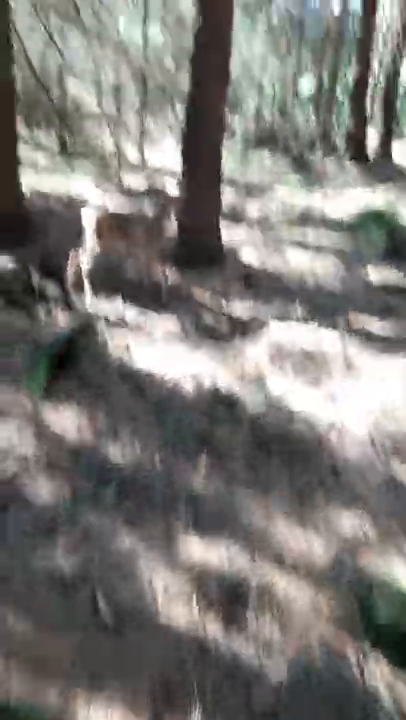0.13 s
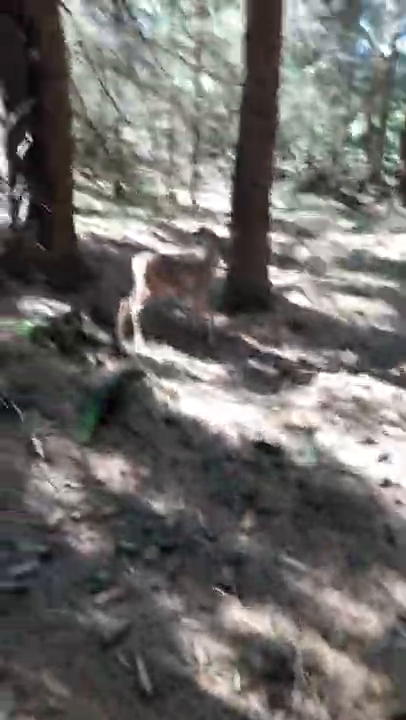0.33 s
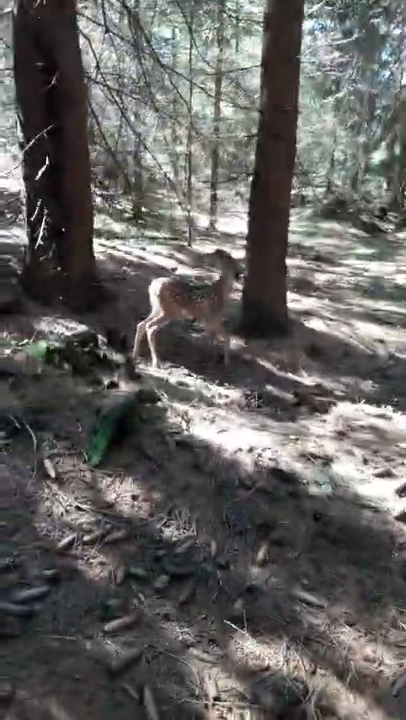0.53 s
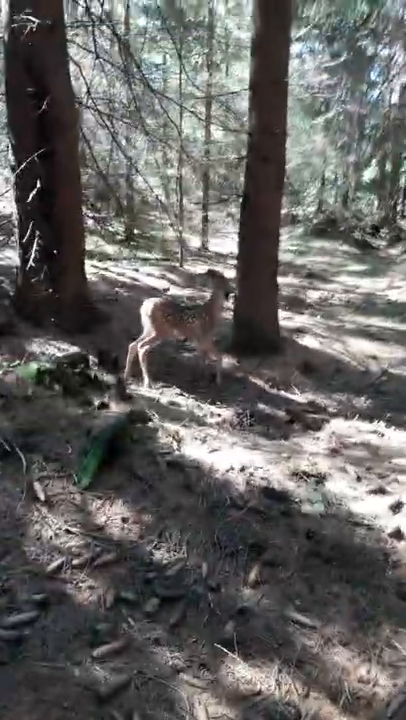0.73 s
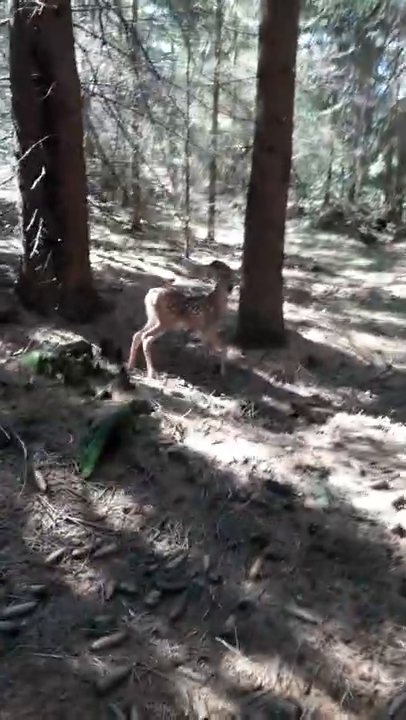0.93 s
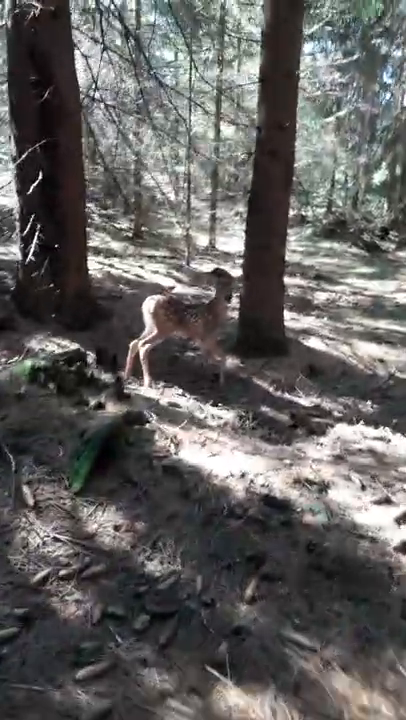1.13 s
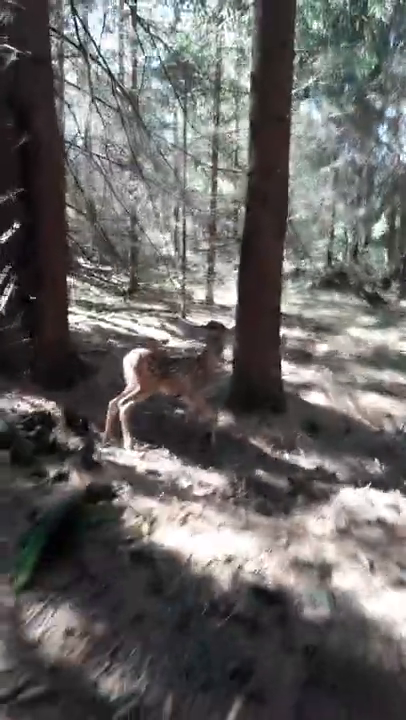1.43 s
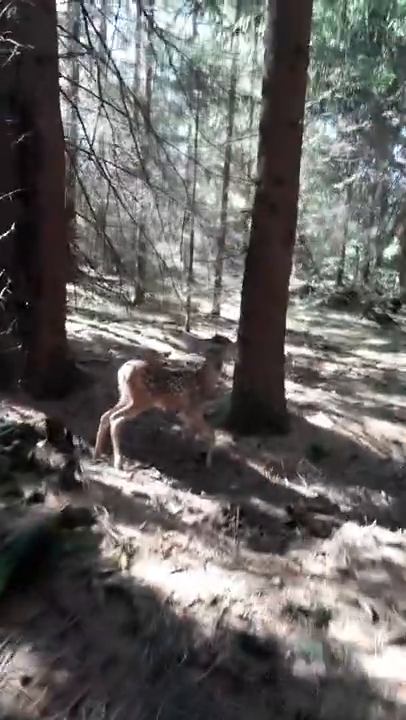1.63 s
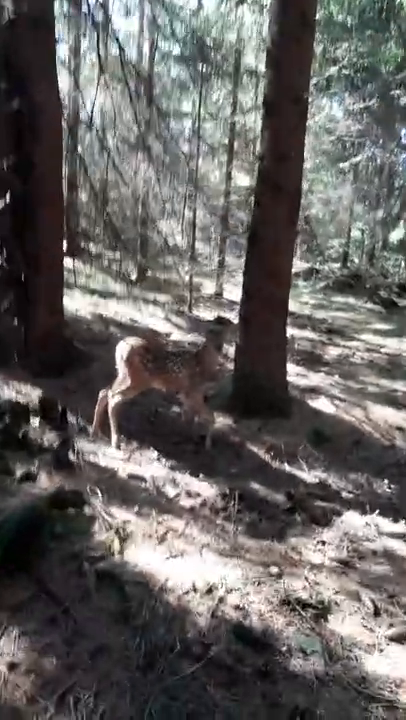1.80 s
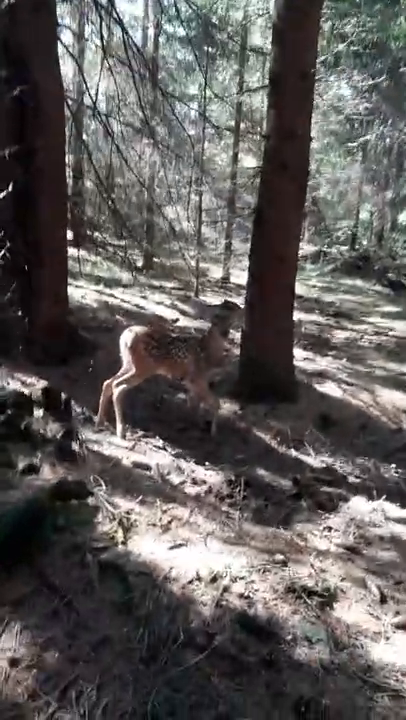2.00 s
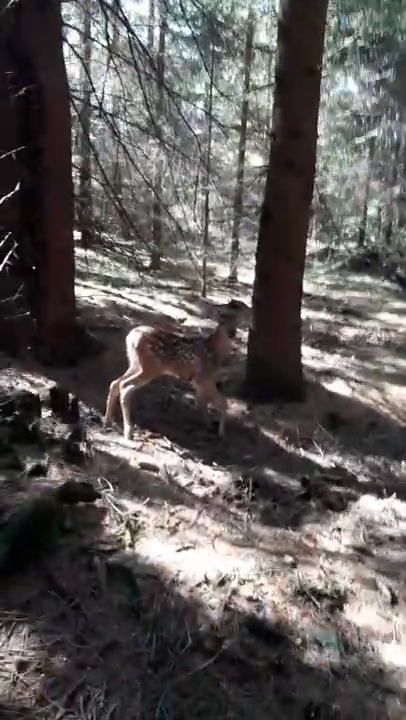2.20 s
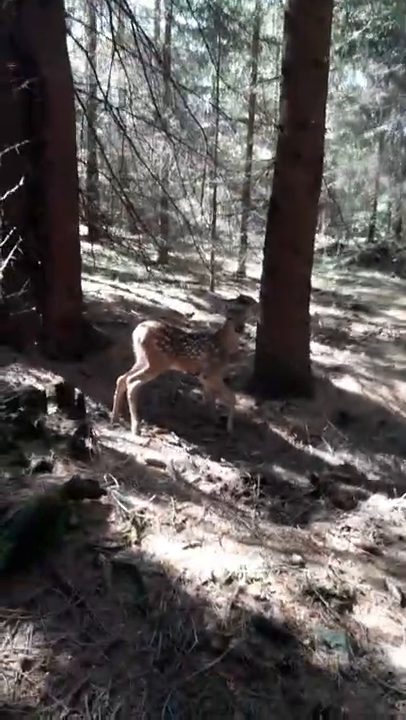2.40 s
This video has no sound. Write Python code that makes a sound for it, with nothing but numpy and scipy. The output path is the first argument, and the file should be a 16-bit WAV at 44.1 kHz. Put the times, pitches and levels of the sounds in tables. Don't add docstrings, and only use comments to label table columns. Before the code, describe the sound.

A fawn's single loud bleat starts near 0.2 s, sweeps up quickly to a bright, nasal, squeaky held pitch, then drops and stops by 0.8 s, leaving a diffuse echo among the trunks. From about 0.7 to 1.6 s a distant finch trills downward, then adds three swooping whistles and a buzzy falling slur until 2.5 s. Dry needles faintly rustle and snap throughout over low air and microphone hiss.

```python
import sys
import numpy as np
from scipy import signal
from scipy.fft import rfft, irfft, next_fast_len
from scipy.io import wavfile
from scipy.ndimage import uniform_filter1d, map_coordinates

SR = 44100
rng = np.random.default_rng(int(sys.argv[2]) if len(sys.argv) > 2 else 0)


def dump(signal):
    limited = np.clip(np.atleast_2d(signal).T, -1, 1)
    pcm = np.round(limited * 32767).astype(np.int16)
    wavfile.write(sys.argv[1], SR, pcm)


def magnitude_from_level(level_db):
    exponent = np.asarray(level_db, float) / 20
    return 10 ** exponent


N = 112454
T = np.arange(N) / SR

# [t/s, pitch f/Hz, effort level/dB, mouth opening 0-1, brightness dB/octave]
BLEAT = [
    (0.186, 399, -47, 0.96, 5),
    (0.238, 532.7, -23.5, 0.02, 1.5),
    (0.292, 637, -18.5, 0.2, .1),
    (.35, 676.8, -17.5, 0.5, 1.53),
    (0.459, 706.5, -20, 0.8, 0.5),
    (0.498, 700, -18, 0.9, 0.9),
    (.612, 704.3, -19.5, 1, 1.24),
    (.65, 639, -17.5, 0.85, 0.72),
    (0.791, 399.4, -33.5, 0.5, -4),
]
# [f/Hz, width/Hz, level/dB]
THROAT_EARLY = [(700, 300, -8), (1203, 500, -4.5), (1750, 260, 2.5), (2524, 190, 0), (3400, 400, -5),
                (3982, 350, -3.5), (5060, 510, -7.5), (6093, 500, -14), (7430, 700, -21),
                (8900, 270, -21.5), (10600, 900, -55), (14000, 900, -61)]
# [f/Hz, width/Hz, level/dB]
THROAT_LATE = [(777.6, 380, -1), (1181, 220, 3), (2100, 430, -7), (2760, 390, 4), (3534, 400, -14.5),
               (4114, 350, -5.5), (5126, 400, -15), (6218, 620, -15.5), (7000, 400, -34.5),
               (8690, 400, -35.5), (10250, 900, -47), (14000, 900, -63)]
# [f/Hz, width/Hz, depth/dB]
CALL_GAPS = [(4600, 220, 20.5), (6750, 240, 22), (12300, 1800, 13), (7350, 350, 7.5)]
# [f/Hz, time to fall 60 dB t/s]
WOOD_RING = [(400, 0.24), (1300, 0.73), (3000, 0.75), (6000, 0.87), (10000, 0.24)]
# [f/Hz, time to fall 60 dB t/s]
DEEP_RING = [(500, 0.67), (1500, 1.7), (4000, 1.5), (8000, 0.55)]
# [f/Hz, time to fall 60 dB t/s]
FINCH_RING = [(2000, 0.2), (3500, 0.79), (5000, 0.56)]
# [start t/s, length t/s, from f/Hz, to f/Hz, bend, level/dB]
TRILL = [
    (-.002, .018, 6500, 4100, .35, 8),
    (.024, .024, 2950, 4857, 1.1, 7),
    (0.061, .02, 4124, 3600, .5, 2),
]
# [t/s, f/Hz, level/dB]
SWOOP = [
    (0, 3400, 6),
    (0.029, 2000, -5.5),
    (.055, 2400, -1),
    (0.096, 4807, 8.5),
    (0.124, 4640, -4.5),
    (.16, 4500, -20),
]
SWOOP_STARTS = [1.665, 1.833, 2.003]
# [t/s, f/Hz, level/dB, buzz depth f/Hz]
SLUR = [
    (2.178, 5000, -42.5, -2),
    (2.195, 6360, -53.5, 201.5),
    (2.25, 5550, -47, 884.5),
    (2.30, 5050, -53, 897),
    (2.345, 4600, -49, 500),
    (2.355, 4250, -48.5, 0),
    (2.44, 2900, -51.5, -6),
    (2.52, 2100, -51, 0),
    (2.55, 1850, -67, 0),
]
# [middle t/s, length t/s, level/dB, crisp top level/dB]
SHUFFLES = [(.03, 0.49, -67.5, 6), (.78, .05, -46.5, -8), (1.17, 0.081, -65, 5), (1.414, .17, -54.5, -3.5),
            (1.525, 0.088, -58, 3.5), (1.628, 0.13, -58, 10), (1.711, 0.056, -61, 2),
            (1.95, 0.068, -66.5, 9.5), (2.06, 0.056, -88, 9.5), (2.55, 0.055, -60.5, 6.5)]
# [t/s, peak level/dB]
SNAPS = [(.073, -41), (.113, -50), (1.173, -43), (1.338, -38.5), (1.506, -52), (1.54, -59), (1.826, -56),
         (1.957, -45), (2.078, -51.5)]
# [middle t/s, length t/s, f/Hz, level/dB]
SCUFFS = [(1.472, 0.093, 1728, -60), (1.66, .03, 1400, -66), (2.355, 0.011, 1750, -70.5)]
# [f/Hz, level/dB]
LITTER = [(300, -43.5), (1500, -18), (4300, -19), (5600, -1.5), (6600, -4), (7200, -26.5), (8800, -16.5),
          (9600, -37.5)]
# [f/Hz, level/dB]
AIR = [(20, -42), (50, -13.5), (110, -3.5), (200, -10), (600, -15.5), (3000, -18), (10000, -28.5),
       (15000, -30.5)]

GLIDE_S, ONSET_S, RELEASE_S = 0.022, 0.012, 0.0092
SKIRT_DB, SHIMMER_DB, JITTER = -77.5, 2.5, 0.0015
BREATH_DB, SLACK_BREATH_DB, SLACK_FLUTTER_DB = -32, 30, 11
UNDERTONE_BELOW_HZ, UNDERTONE_DB = 376, -50
CLOSE_S, CLOSE_DB_PER_S = 0.738, 800
LOW_CUT_HZ = 480
EARLY_DB, EARLY_T60_S, EARLY_FROM_HZ = -8, 0.08, 1400
WOOD_DB, WOOD_DELAY_S, DEEP_WOOD_DB = -20, 0.02, -36
TRILL_START_S, TRILL_PERIOD_S, TRILL_SINK, TRILL_DB = 0.664, 0.111, 0.034, -51
NOTE_ARCH_DB = 9.5
SWOOP_DB, BUZZ_HZ = -51, 167
WAVER_HZ, WAVER_DB = 50, 2.5
FAR_DIRECT_DB, FLOURISH_DIRECT_DB = -3, -9
GRAINS_PER_S, GRAIN_SPREAD_DB = 1500, 2.6
LITTER_BED_DB, FADE_STRETCH, AIR_DB = -64, 1.4, -72
TOP_HZ = 15700


def unit(x):
    return x / np.sqrt(np.mean(x ** 2) + 1e-20)


def along(points, hz):
    f, v = np.transpose(points)
    return np.interp(np.log(hz + 1), np.log(f + 1), v)


def wobble(rate):
    return map_coordinates(rng.standard_normal(int(N * rate / SR) + 4), [T * rate])


def filtered(x, response):
    m = next_fast_len(N + SR // 2)
    return irfft(rfft(x, m) * response(np.fft.rfftfreq(m, 1 / SR)), m)[:N]


def low_cut(hz, edge_hz, steepness):
    return 1 / (1 + (edge_hz / (hz + 1)) ** steepness)


def throat(peaks, hz):
    power = sum(magnitude_from_level(2 * db) / (1 + (2 * (hz - c) / w) ** 2) ** 2 for c, w, db in peaks)
    return np.sqrt(power + magnitude_from_level(2 * SKIRT_DB))


def fawn():
    s, *cols = np.transpose(BLEAT)
    smooth = [uniform_filter1d(np.interp(T, s, c), int(GLIDE_S * SR)) for c in cols]
    pitch, effort_db, mouth, tilt_db = smooth
    pitch = pitch * (1 + JITTER * wobble(90))
    mouth = np.clip(mouth, 0, 1)
    gate = np.clip((T - s[0]) / ONSET_S, 0, 1) * np.clip((s[-1] - T) / RELEASE_S, 0, 1)
    phase = 2 * np.pi * np.cumsum(pitch) / SR
    slack = 1 - pitch / pitch.max()
    shut_db = CLOSE_DB_PER_S * np.clip(T - CLOSE_S, 0, 1)

    voice = 0
    for k in range(1, 21):
        hz = k * pitch
        shape = throat(THROAT_EARLY, hz) ** (1 - mouth) * throat(THROAT_LATE, hz) ** mouth
        shape = shape * magnitude_from_level(tilt_db * np.log2(hz / 1500))
        unsteady_db = SHIMMER_DB * wobble(35) + SLACK_FLUTTER_DB * slack * wobble(90)
        level_db = min(k / 5, 1) * unsteady_db - min(k - 1, 2) / 2 * shut_db
        voice = voice + shape * magnitude_from_level(level_db) * np.sin(k * phase + rng.uniform(0, 2 * np.pi))

    breath = unit(filtered(rng.standard_normal(N), lambda hz: throat(THROAT_EARLY, hz)))
    breath = breath * (1 + np.cos(phase))
    breath_db = BREATH_DB + SLACK_BREATH_DB * slack + tilt_db - shut_db
    under = np.sin(phase - 2 * np.pi * UNDERTONE_BELOW_HZ * T) * (pitch > 1.55 * UNDERTONE_BELOW_HZ)
    call = np.sqrt(2) * voice + magnitude_from_level(breath_db) * breath
    return gate * magnitude_from_level(effort_db) * np.array([call, magnitude_from_level(UNDERTONE_DB) * under])


def call_colour(hz):
    gaps_db = sum(db * np.exp(-(2 * (hz - c) / w) ** 2) for c, w, db in CALL_GAPS)
    return low_cut(hz, LOW_CUT_HZ, 4) * magnitude_from_level(-gaps_db)


def echoes(x, t60s, delay_s):
    hz, t, z = signal.stft(rng.standard_normal(SR), SR, nperseg=256)
    fade = magnitude_from_level(-60 * t / along(t60s, hz)[:, None])
    tail = signal.istft(z * fade, SR, nperseg=256)[1]
    late = np.pad(x, (int(delay_s * SR), 0))
    return signal.fftconvolve(late, tail / np.linalg.norm(tail))[:N]


def ringing_wood(call):
    deep = magnitude_from_level(DEEP_WOOD_DB) * echoes(call, DEEP_RING, 0.08)
    wood = magnitude_from_level(WOOD_DB) * echoes(call, WOOD_RING, WOOD_DELAY_S)
    bright = filtered(call, lambda hz: low_cut(hz, EARLY_FROM_HZ, 4))
    near = magnitude_from_level(EARLY_DB) * echoes(bright, [(1000, EARLY_T60_S)], 0.0033)
    return deep + wood + near


def whistle(rows):
    s, hz, db, buzz = np.transpose(rows)
    gate = np.clip(np.minimum(T - s[0], s[-1] - T) / 0.002, 0, 1)
    swing = np.interp(T, s, buzz) * np.sin(2 * np.pi * BUZZ_HZ * T)
    pitch = np.interp(T, s, hz) + swing + WAVER_HZ * wobble(150)
    return gate * magnitude_from_level(np.interp(T, s, db)) * np.sin(2 * np.pi * np.cumsum(pitch) / SR)


def finch():
    trill, u = 0, np.linspace(0, 1, 6)
    for k in range(9):
        sink = 1 - TRILL_SINK * max(k - 3, 0)
        for start, length, hz0, hz1, bend, db in TRILL:
            hz = (hz0 + (hz1 - hz0) * u ** bend) * sink
            at = TRILL_START_S + k * TRILL_PERIOD_S + start + u * length
            level_db = TRILL_DB + db - NOTE_ARCH_DB * (1.4 * u - 1) ** 2
            trill = trill + whistle(np.transpose([at, hz, level_db, 0 * u]))
    flourish = whistle(SLUR)
    for start in SWOOP_STARTS:
        flourish = flourish + whistle([(start + s, hz, SWOOP_DB + db, 0) for s, hz, db in SWOOP])
    waver = magnitude_from_level(WAVER_DB * wobble(120))
    direct = magnitude_from_level(FAR_DIRECT_DB) * trill + magnitude_from_level(FLOURISH_DIRECT_DB) * flourish
    return waver * direct + echoes(waver * (trill + flourish), FINCH_RING, 0.004)


def bump(mid_s, length_s):
    u = 2 * (T - mid_s) / length_s
    return np.exp(-np.where(u < 0, u ** 4, (u / FADE_STRETCH) ** 2))


def litter_colour(hz):
    return magnitude_from_level(along(LITTER, hz)) / (1 + (hz / 11500) ** 8)


def litter():
    grains = rng.random(N) < GRAINS_PER_S / SR
    grains = grains * magnitude_from_level(GRAIN_SPREAD_DB * rng.exponential(size=N))
    grains = grains * rng.standard_normal(N)
    crackle = unit(rng.standard_normal(N) + 0.6 * unit(grains)) * magnitude_from_level(2.5 * wobble(25))
    needles = unit(filtered(crackle, litter_colour))
    top = filtered(needles, lambda hz: low_cut(hz, 7000, 20))
    out = magnitude_from_level(LITTER_BED_DB) * needles
    for s, length, db, crisp_db in SHUFFLES:
        out = out + magnitude_from_level(db) * bump(s, length) * (needles + (magnitude_from_level(crisp_db) - 1) * top)

    snaps = sum(magnitude_from_level(db - 60 * np.clip(T - s, 0, 1) / 0.025) * (T >= s) for s, db in SNAPS)
    out = out + magnitude_from_level(9.5) * filtered(snaps * rng.standard_normal(N), litter_colour)

    for s, length, hz, db in SCUFFS:
        dull = filtered(rng.standard_normal(N), lambda f: 1 / (1 + ((f - hz) / (0.3 * hz)) ** 4))
        out = out + magnitude_from_level(db) * bump(s, length) * unit(dull)
    return out


def air():
    drift = magnitude_from_level(AIR_DB + 0.8 * wobble(6))
    return drift * unit(filtered(rng.standard_normal(N), lambda hz: magnitude_from_level(along(AIR, hz))))


def scene():
    call, under = fawn()
    call = filtered(call, call_colour)
    wet = ringing_wood(call)
    return (call + under + wet + finch() + litter() + air())[None]


def roll_off(x):
    return signal.sosfilt(signal.butter(12, 15640, fs=SR, output="sos"), x)


def record(dry):
    mix = filtered(dry[0], lambda hz: hz < TOP_HZ)[None]
    return roll_off(mix)


dry = scene()
out = record(dry)
dump(out)
```